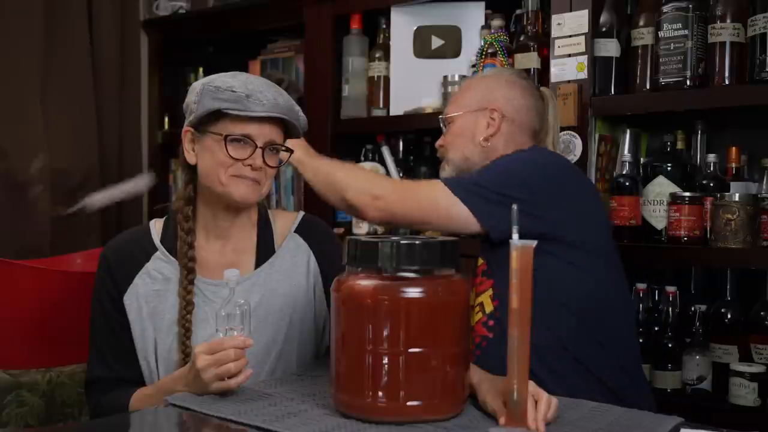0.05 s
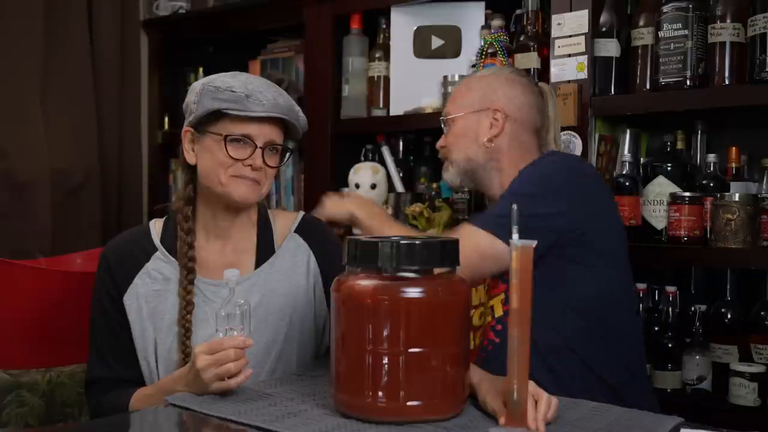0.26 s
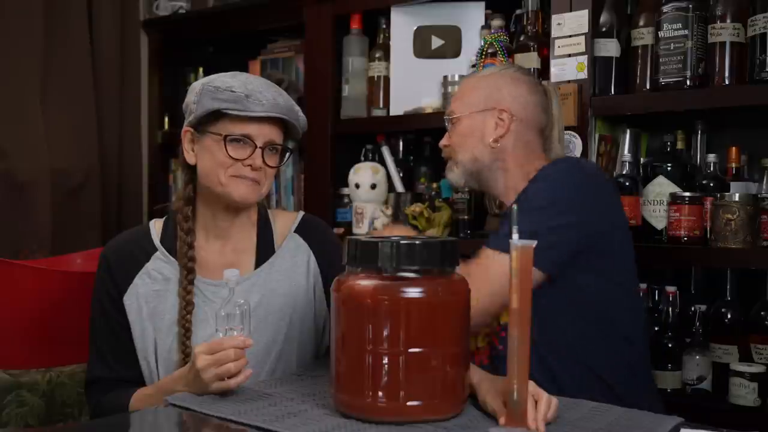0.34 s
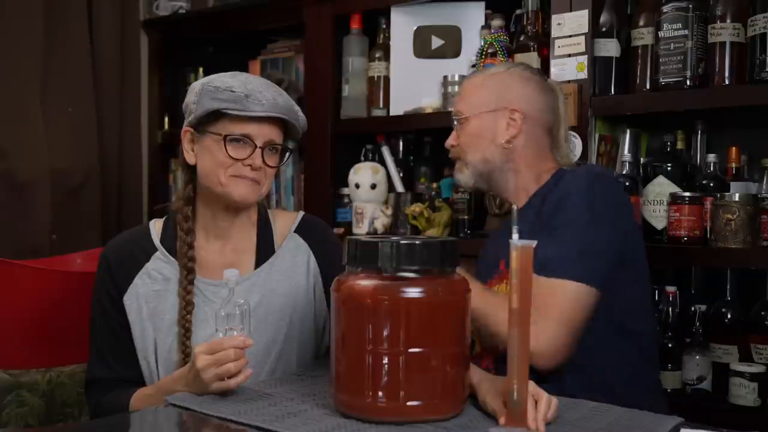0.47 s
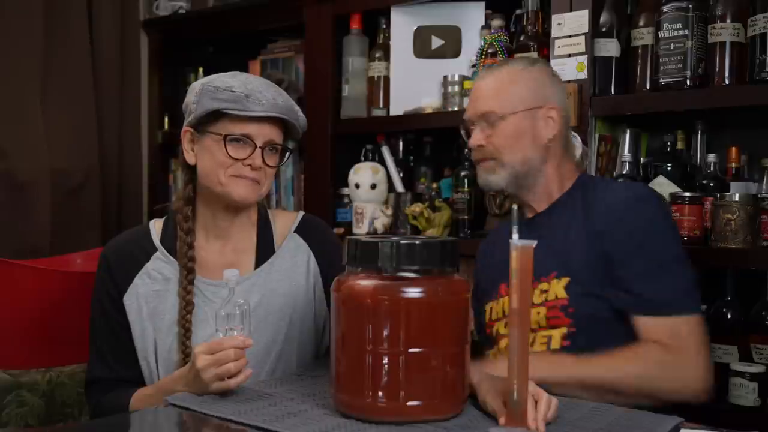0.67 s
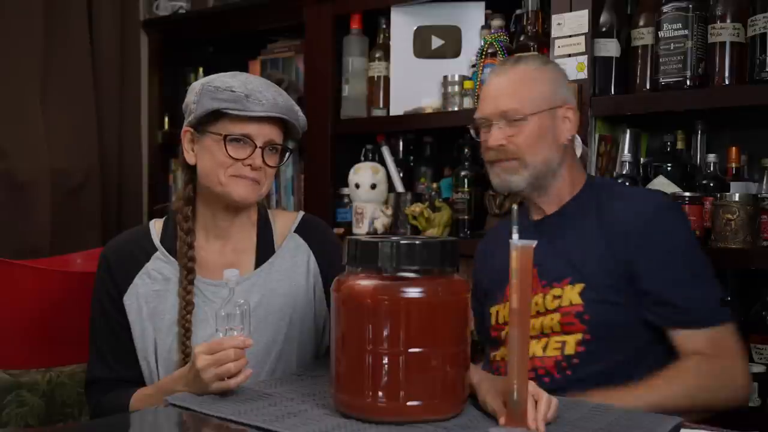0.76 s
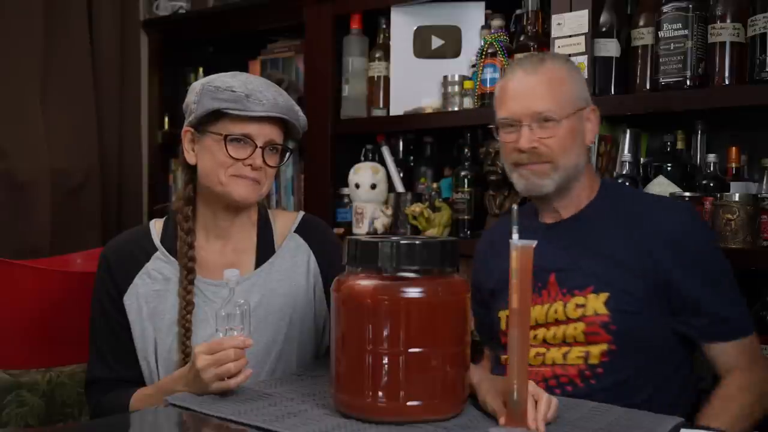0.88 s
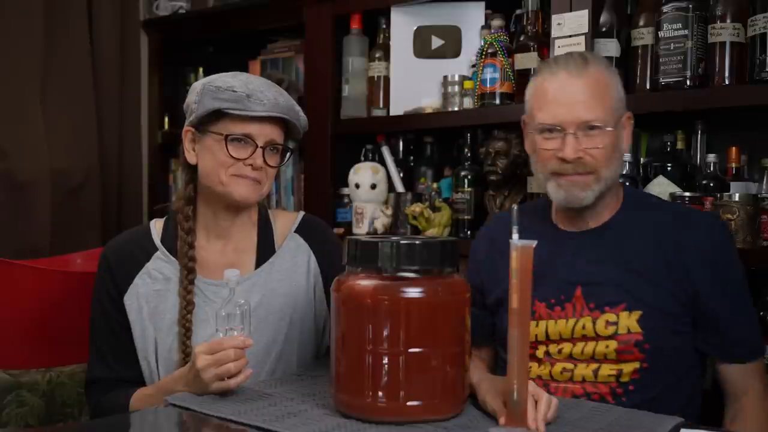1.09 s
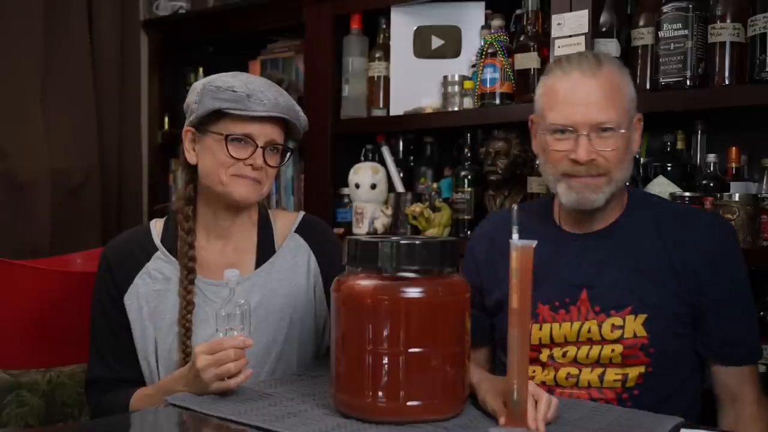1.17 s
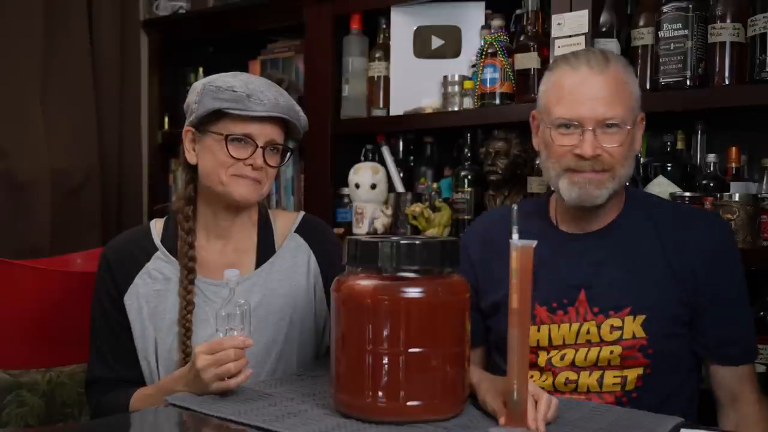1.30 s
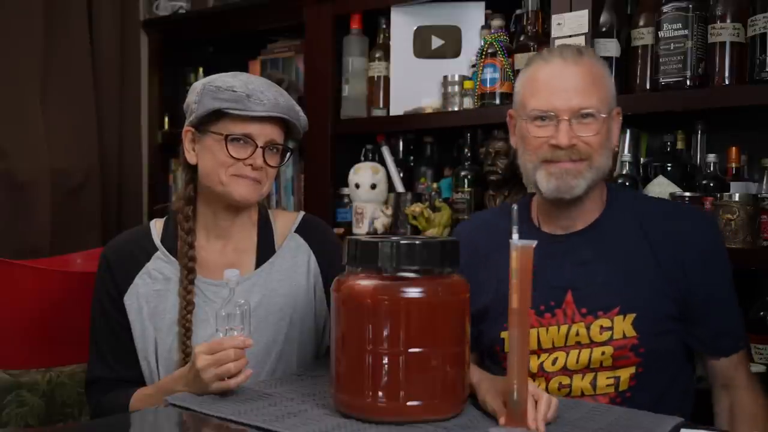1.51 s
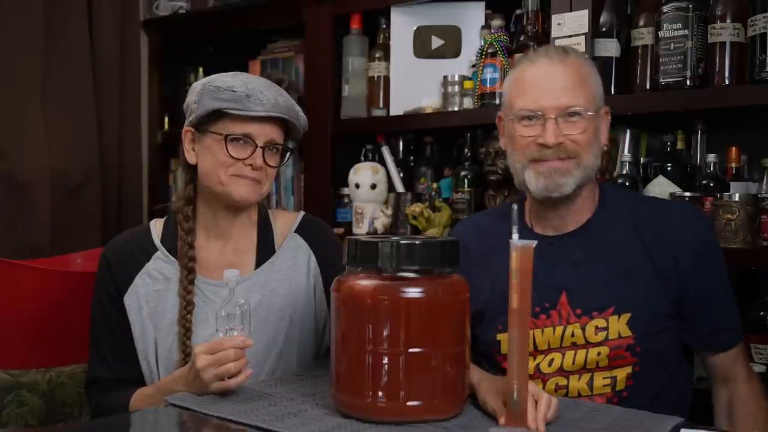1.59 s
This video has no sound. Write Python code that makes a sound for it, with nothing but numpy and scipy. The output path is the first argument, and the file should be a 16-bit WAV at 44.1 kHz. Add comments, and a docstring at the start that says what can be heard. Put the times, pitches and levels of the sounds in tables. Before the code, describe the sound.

Glass shatters on a hard floor in a quiet, dry room. Faint low room noise comes first; at about 0.23 seconds a sharp, bright crash bursts out with a short low boom, and a large piece rings until about 0.43. Shards clink and bounce with duller clacks until about 1.2, then sparse, faint tinkles fade by 1.6, leaving quiet room noise.

```python
"""Something of glass is thrown aside in a quiet room, heard as faint noise, and shatters on a hard floor.
First comes a dense crash, summed from many short tones and noise, over low booms from decaying modes.
At once one big piece rings as a bank of modes struck three times, and is soon damped.
Then shards clink, bounce and settle, as noise bursts with modes; heavier pieces clack as pitched puffs.
Sparse random reflections give each glass sound a short reverberation."""
import sys
import numpy as np
from scipy import signal
from scipy.fft import rfft, irfft
from scipy.io import wavfile
from scipy.ndimage import uniform_filter1d

SR = 44100
rng = np.random.default_rng(int(sys.argv[2]) if len(sys.argv) > 2 else 0)


def unload_audio(sound):
    """Save the sound as a 16-bit wav file, at the path given as the first command line argument."""
    columns = np.transpose(np.atleast_2d(sound))
    # keep every value between -1 and 1, then stretch to whole-number steps
    steps = np.round(np.clip(columns, -1, 1) * 32767)
    wavfile.write(sys.argv[1], SR, steps.astype(np.int16))


def to_linear_factor(level_db):
    """Convert decibel levels (scalar or array-like) to linear amplitude factors."""
    exponent = np.asarray(level_db, float) / 20
    return 10 ** exponent


N = 72765  # length in samples

# Envelopes of the rush of tiny fragments. Each row: time in seconds, treble level in dB, body level in dB.
CRASH_LEVELS = [(.226, -16.5, -20), (.27, -20, -24.5), (0.319, -15, -23.5), (.35, -23, -23),
                (.38, -26, -31.5), (.42, -32.5, -34.5), (0.452, -30.5, -32), (.485, -36.5, -42),
                (0.518, -26.5, -36), (0.569, -40, -31.5), (.62, -33.5, -40.5), (.675, -46, -44.5),
                (0.751, -34.5, -36.5), (.8, -38.5, -45), (.86, -52.5, -51), (.92, -48, -52),
                (1.04, -53.5, -56), (1.2, -60, -59), (1.65, -63.5, -68.5)]
# Spectrum of the splinters' hiss. Each row: frequency in Hz, relative level in dB.
GRIT_SPECTRUM = [(900, -26), (1600, -1.5), (2600, -4.5), (6000, -5.5), (10300, -6.5), (13500, -14.5),
                 (16000, -21)]
# Spectrum of the dull clacks. Each row: frequency in Hz, relative level in dB.
BODY_SPECTRUM = [(30, -45), (90, -13), (200, -6), (350, -9), (1200, -3.5), (3000, -22.5), (5000, -50)]
# Modes of the big piece. Each row: frequency in Hz, level relative to the blow in dB, t60 in seconds.
PANE_MODES = [(3515, -7, .3), (4054, -9, .17), (5152, 1, .3), (5745, -9, .4), (6366, -1, .12),
              (6968, -6, .18), (7620, -8, .25), (8333, -10, .3), (8985, -6, .2), (9592, -7.5, .25),
              (10070, -9, .25), (10982, -7, .33), (12100, -11, .3), (13362, -13, .2)]
# Blows on the big piece. Each row: start in seconds, level in dB.
PANE_BLOWS = [(.254, -15), (.308, -27.5), (.349, -25.5)]
# Shards landing. Each row: start in seconds, landing level in dB, main mode in Hz, second mode in Hz,
# main mode relative to the landing level in dB, free t60 of the main mode in seconds.
SHARD_LANDINGS = [(0.232, -25, 8650, 11800, 7, 0.087), (.254, -10, 2960, 6420, -2, 0.05),
                  (.307, -3.5, 3150, 9300, -9, 0.027), (0.347, -11, 4060, 12100, -5, 0.018),
                  (0.387, -18.5, 3500, 9000, -4, 0.031), (0.404, -14, 7760, 11000, -5, 0.022),
                  (0.458, -22, 8230, 11840, 1, 0.062), (0.495, -18.5, 5400, 10320, -3, 0.025),
                  (0.501, -22, 11500, 15100, -4.5, 0.035), (0.511, -28.5, 3866, 3200, 0.5, 0.26),
                  (0.579, -32.5, 6076, 4350, -0.5, 0.1), (0.611, -28, 4430, 10800, -11, 0.051),
                  (0.631, -19.5, 5780, 2450, -6.5, 0.046), (0.656, -37, 5360, 12300, 3.5, 0.057),
                  (.680, -22, 7020, 10100, -4, 0.05), (.686, -37, 3676, 5270, 8, 0.15),
                  (0.699, -33, 6120, 7300, 8, 0.064), (0.735, -13, 4310, 3070, -4.5, 0.021),
                  (0.763, -34, 6030, 7200, -1, 0.063), (0.787, -30.5, 4420, 10600, -3, 0.054),
                  (0.813, -33.5, 2860, 6230, 3.5, 0.029), (0.871, -33, 6860, 12600, -3.5, 0.055),
                  (0.875, -33, 4150, 9600, -3, 0.089), (0.911, -34.5, 6920, 11100, -5, 0.066),
                  (0.941, -26, 6670, 3530, -8.5, 0.12), (.944, -36.5, 4890, 2290, -1, 0.18),
                  (0.995, -29.5, 7000, 5570, -4, 0.05), (1.038, -38.5, 4120, 6000, -13, 0.083),
                  (1.061, -24, 10030, 7100, -0.5, 0.068), (1.064, -29, 14060, 3930, 1, 0.058),
                  (1.076, -24.5, 4615, 8000, -4, 0.059), (1.141, -23, 5350, 10170, -13, 0.028),
                  (1.226, -37.5, 4240, 10400, -14, 0.036), (1.3, -41, 4070, 10500, -2, 0.035),
                  (1.361, -61, 10020, 4200, 14.5, 0.048), (1.468, -39.5, 5450, 10300, -4.5, 0.029),
                  (1.48, -40.5, 7740, 12900, -12, 0.034), (1.497, -39, 4950, 11040, -8, 0.048),
                  (1.528, -45.5, 9060, 15000, 3, 0.067), (1.558, -44.5, 7720, 10800, -2.5, 0.093),
                  (1.588, -45.5, 9260, 15100, 0, 0.05)]
# Spectrum of a landing's crack. Each row: frequency in Hz, relative level in dB.
CRACK_SPECTRUM = [(200, -9), (900, -5.5), (2000, -6), (3000, -2.5), (9000, -5.5), (16000, -20)]
# Heavier pieces clacking and thudding. Each row: start in seconds, relative level in dB,
# centre frequency in Hz, t60 of the noise in seconds.
HEAVY_KNOCKS = [(0.259, -13.5, 1290, 0.056), (.294, -12.5, 2240, 0.011), (.321, -19, 1700, 0.037),
                (0.3425, -12.5, 1690, 0.022), (0.35, -9.5, 1210, 0.029), (.37, -16, 605, 0.021),
                (.374, -20, 1400, 0.033), (0.528, -34, 255, 0.13), (.538, -27.5, 590, 0.063),
                (0.5532, -13.5, 2830, 0.021), (0.564, -22.5, 385, 0.018), (0.6843, -21.5, 2170, 0.023),
                (0.723, -24, 247, 0.011), (0.736, -17.5, 736, 0.022), (.815, -34.5, 736, 0.025),
                (.854, -22, 1060, 0.0079), (0.857, -25.5, 960, 0.0078), (.903, -27, 550, 0.011),
                (.914, -27.5, 274, 0.024), (1.004, -33, 674, 0.038), (1.021, -22, 444, 0.012),
                (1.059, -30, 1160, 0.026), (1.099, -27, 3840, 0.026), (1.134, -39, 1240, 0.025),
                (1.177, -25.5, 1120, 0.0084), (1.251, -47, 4170, 0.035), (1.262, -42.5, 780, 0.027),
                (1.324, -43, 3800, 0.0084), (1.316, -39, 405, 0.02), (1.38, -40.5, 1230, 0.029),
                (1.432, -51, 3600, 0.011), ]
# The floor booming under the largest pieces. Each row: start in seconds, level in dB,
# frequency in Hz, t60 in seconds.
FLOOR_BOOMS = [(.254, -18.5, 269, 0.12), (0.303, -20, 241.6, 0.14), (0.334, -37, 67, 0.2)]
# Colour of the sound that differs between the ears. Each row: frequency in Hz, gain in dB.
SIDE_COLOUR = [(100, 6.5), (2000, 2.5), (12000, 7.5)]
# Spectrum of the room noise. Each row: frequency in Hz, relative density in dB per Hz.
HUSH_SPECTRUM = [(26, -50), (65, -5.5), (265, -7), (305, -5.5), (361, -18), (479, -11.5), (839, -21),
                 (2810, -31.5), (16500, -50)]


def evened(x):
    """Normalization: scales a signal to unit rms."""
    return x / np.sqrt(np.mean(x ** 2) + 1e-20)


def read(points, hz):
    """Interpolation of a spectrum along a logarithmic frequency axis."""
    f, value = np.transpose(points)
    return np.interp(np.log(hz + 1), np.log(f + 1), value)


def colour(x, points):
    """Linear filtering: multiplies the spectrum by a gain curve in dB."""
    hz = np.fft.rfftfreq(x.shape[-1], 1 / SR)
    return irfft(rfft(x) * to_linear_factor(read(points, hz)), x.shape[-1])


def add(mix, s, sound):
    """Superposition: adds a sound into the mix from s seconds on."""
    part = mix[round(s * SR):][:len(sound)]
    part += sound[:len(part)]


def ring(hz, db, t60, size=8000):
    """Damped resonance: one mode, decaying exponentially after a soft first cycle; t60 is at least 3 ms."""
    t = np.arange(size) / SR
    decay = to_linear_factor(db - 60 * t / max(t60, .003))
    return decay * np.sin(2 * np.pi * hz * t) * np.minimum(t * hz, 1)


def grains(per_s, lo_hz, hi_hz, cycles, spread_db, count):
    """Granular superposition: resonances at many pitches, each excited by its own sparse random clicks."""
    out = np.zeros(N)
    pitches = np.geomspace(lo_hz, hi_hz, count)
    for hz, long in zip(pitches, rng.exponential(1, count)):
        strength = to_linear_factor(spread_db * np.minimum(rng.exponential(1, N), 4))
        clicks = strength * (rng.random(N) < per_s / count / SR)
        tone = ring(hz, 0, cycles * (0.3 + long) / hz, size=3000)
        out += signal.oaconvolve(clicks, np.sqrt(hz) * tone / np.linalg.norm(tone))[:N]
    return evened(out)


def crash():
    """Superposed fractures: ringing splinters and hiss above, dull clacks below; also hiss of opposite sign per ear."""
    break_s, treble_rise_s, body_rise_s = .226, .0025, 0.021
    scatter_db = -15.5  # fragments fly left and right: their hiss differs between the ears
    s, treble_db, body_db = np.transpose(CRASH_LEVELS)
    t = np.arange(N) / SR
    treble_level = np.clip((t - break_s) / treble_rise_s, 0, 1) * to_linear_factor(np.interp(t, s, treble_db))
    body_level = np.clip((t - break_s) / body_rise_s, 0, 1) * to_linear_factor(np.interp(t, s, body_db))
    hiss = rng.standard_normal((3, N))
    splinters = grains(2500, 1500, 16000, cycles=97, spread_db=3.5, count=90)
    grit = evened(colour(0.61 * splinters + 0.7 * hiss[0], GRIT_SPECTRUM))
    clacks = grains(1500, 199, 3510, cycles=5.5, spread_db=2.0, count=30)
    body = evened(colour(0.96 * clacks + 0.51 * hiss[1], BODY_SPECTRUM))
    scattered = evened(colour(colour(hiss[2], GRIT_SPECTRUM), SIDE_COLOUR))
    apart = to_linear_factor(scatter_db) * treble_level * scattered
    return treble_level * grit + body_level * body, apart


def pane():
    """Modal vibration: each blow excites all modes of the big piece, which is then damped to a tenth."""
    stop_s, stop_fade_s = 0.425, 0.012
    out = np.zeros(N)
    for hz, mode_db, t60 in PANE_MODES:
        mode = np.zeros(N)
        for s, db in PANE_BLOWS:
            add(mode, s, ring(hz, db + mode_db, t60, size=16000))
        out += mode * tumble()
    t = np.arange(N) / SR
    return out * np.clip((stop_s - t) / stop_fade_s + 1, .1, 1)


def shards():
    """Impact excitation: each landing gives a noise crack, two clear modes and 14 faint ones."""
    crack_t60, crack_rise_s = 0.044, 0.00079
    flight_share, settle_db_per_s = 0.33, 2495  # rings freely for this share of its t60, then lies still
    extra_db = -10  # strongest faint mode relative to the landing level
    cracks, rings = np.zeros(N), np.zeros(N)
    noise = evened(colour(rng.standard_normal(N), CRACK_SPECTRUM))
    draws = rng.random((len(SHARD_LANDINGS), 14, 3))
    t = np.arange(8000) / SR
    for (s, db, hz, other_hz, ring_db, t60), draw in zip(SHARD_LANDINGS, draws):
        add(cracks, s, to_linear_factor(db - 60 * t / crack_t60) * np.minimum(t / crack_rise_s, 1))
        settle = to_linear_factor(-settle_db_per_s * np.maximum(t - flight_share * t60, 0))
        main = ring(hz, db + ring_db, t60)
        second = ring(other_hz, db + ring_db - 2.5, 0.84 * t60)
        add(rings, s, settle * (main + second))
        for u, v, late in draw:
            # higher modes die sooner, weaker ones later
            faint_t60 = t60 * (0.76 + 0.93 * v) * (1 - 0.45 * u)
            faint = ring(2300 * 6.5 ** u, db + extra_db - 9 * v, faint_t60)
            add(rings, s + 0.0081 * late ** 2, settle * faint)
    return 0.32 * cracks * noise + rings * tumble()


def tumble():
    """Changing directivity: a tumbling piece turns its faces to and from the ear, so its ring flutters."""
    depth_db, smoothing_s = 1.5, 0.0057  # rms depth
    drift = uniform_filter1d(rng.standard_normal(N), round(smoothing_s * SR))
    return to_linear_factor(depth_db * evened(uniform_filter1d(drift, 60)))


def knocks():
    """Heavily damped impact: one hard push, with a short noise burst gathered round the same pitch."""
    out, t = np.zeros(N), np.arange(4096) / SR
    hz_axis = np.fft.rfftfreq(4096, 1 / SR)
    puffs = rng.standard_normal((len(HEAVY_KNOCKS), 4096))
    for (s, db, hz, t60), puff in zip(HEAVY_KNOCKS, puffs):
        octaves = np.log2(hz_axis / hz + 1e-3)
        puff = evened(irfft(rfft(puff) * to_linear_factor(-6.5 * octaves ** 2)))
        envelope = to_linear_factor(db - 60 * t / max(t60, .003)) * np.minimum(t * hz / 1.11, 1)
        add(out, s, 1.124 * puff * envelope)
        add(out, s, ring(hz, db + 6.5, 2.75 / hz, size=2000))
    return out


def thumps():
    """Structural resonance: each boom of the floor is one low decaying mode."""
    out = np.zeros(N)
    for s, db, hz, t60 in FLOOR_BOOMS:
        add(out, s, ring(hz, db, t60))
    return out


def room(x):
    """Reverberation: sparse decaying reflections of random sign, partly different left and right."""
    mid_t60, side_t60 = 0.085, 0.039  # seconds
    mid_db, side_gain = -9.5, 0.15  # the side gain comes before its colour
    taps = np.zeros((2, 16000))
    # one reflection at random in every 20 samples
    at = np.arange(20, 15860, 20) + rng.integers(0, 20, (2, 792))
    np.put_along_axis(taps, at, rng.choice([-1., 1.], at.shape), 1)
    taps = taps * to_linear_factor(-60 * np.arange(16000) / SR / np.array([[mid_t60], [side_t60]]))
    taps = taps / np.linalg.norm(taps, axis=1, keepdims=True)
    mid, side = signal.fftconvolve(x[None], taps, axes=1)[:, :N]
    return to_linear_factor(mid_db) * mid, side_gain * colour(side, SIDE_COLOUR)


def hush():
    """Partly coherent noise: steady room sound, nearly the same in both ears, a little lumpy."""
    level_db, coherence, lump_db = -49.5, .998, 2.0  # rms levels
    frames, hz = N // 256 + 5, np.fft.rfftfreq(1024, 1 / SR)
    a, b, c, d, patches = rng.standard_normal((frames, 513, 5)).T
    # smooth the lumps over frequency, then over time
    patches = evened(uniform_filter1d(uniform_filter1d(patches, 8, 0), 6, 1))
    left = a + 1j * b
    right = coherence * left + np.sqrt(1 - coherence ** 2) * (c + 1j * d)
    z = np.array([left, right]) * to_linear_factor(read(HUSH_SPECTRUM, hz)[:, None] + lump_db * patches)
    noise = signal.istft(z, nperseg=1024, noverlap=768)[1][:, :N]
    return to_linear_factor(level_db) * evened(noise)


def scene():
    """Superposition of direct glass sound, its reflections and the room noise in two channels."""
    left_db = 0.27  # the glass is raised this much at left and lowered as much at right
    rush, apart = crash()
    glass = rush + pane() + shards() + knocks() + thumps()
    mid, side = room(glass)
    left = to_linear_factor(left_db) * (glass + mid + side + apart)
    right = to_linear_factor(-left_db) * (glass + mid - side - apart)
    return np.array([left, right]) + hush()


def band_limit(x):
    """A steep low-pass at the top of the band."""
    return signal.sosfilt(signal.butter(12, 16810, fs=SR, output="sos"), x)


def record(dry):
    """Band limitation, then soft saturation that rounds the loudest peaks."""
    edge_hz, ceiling = 15950, .95  # ceiling as a share of full scale
    limited = signal.oaconvolve(dry, signal.firwin(301, edge_hz, fs=SR)[None], "same")
    mix = ceiling * np.tanh(limited / ceiling)
    return band_limit(mix)


dry = scene()
out = record(dry)
unload_audio(out)
```